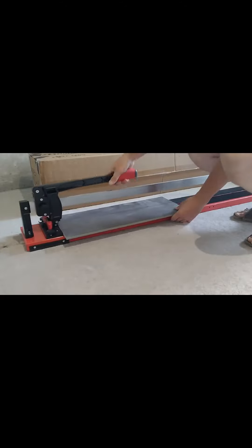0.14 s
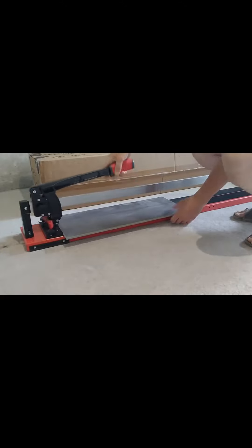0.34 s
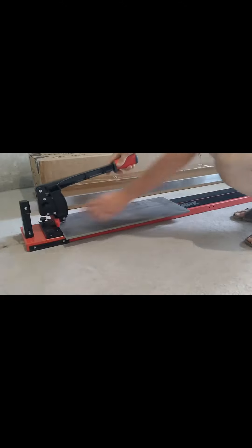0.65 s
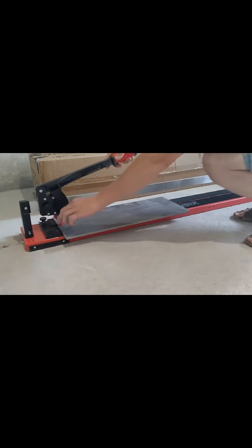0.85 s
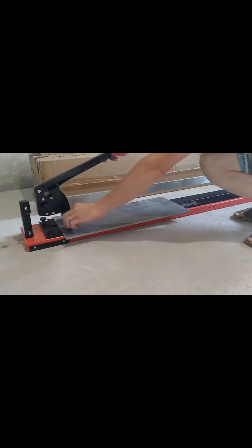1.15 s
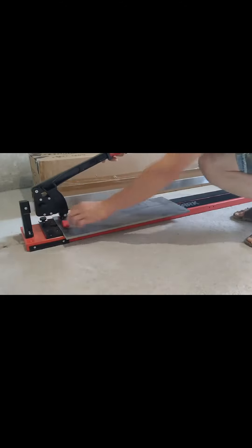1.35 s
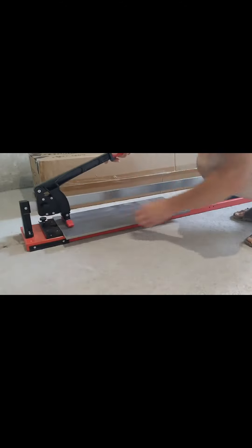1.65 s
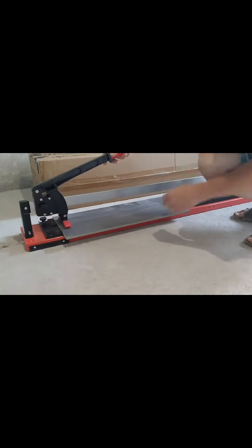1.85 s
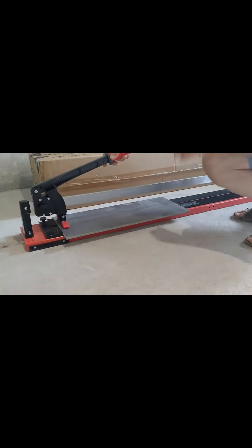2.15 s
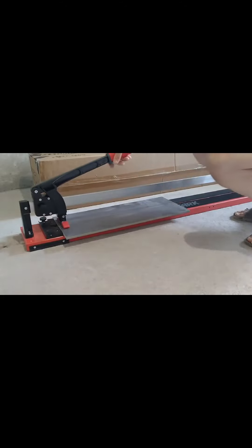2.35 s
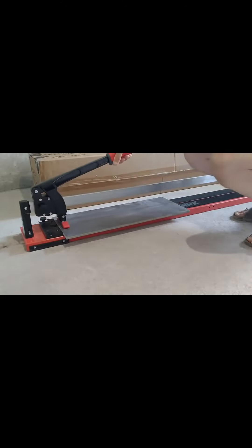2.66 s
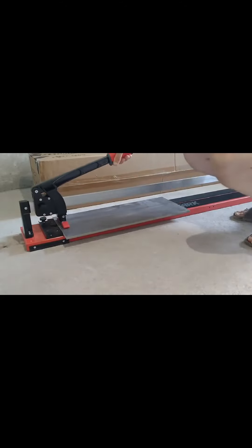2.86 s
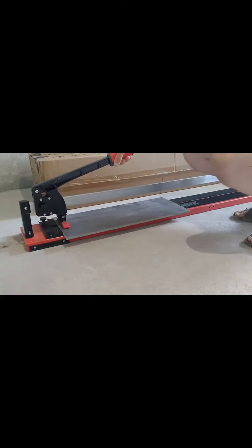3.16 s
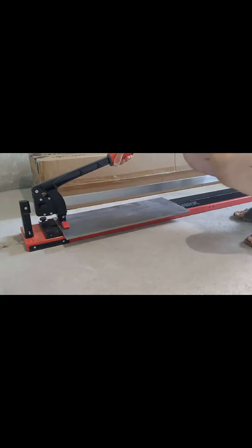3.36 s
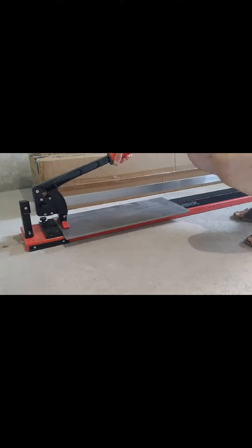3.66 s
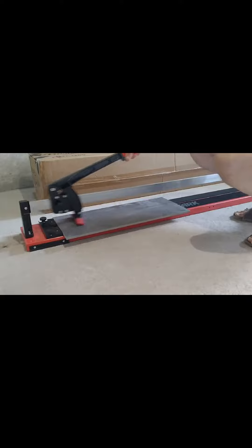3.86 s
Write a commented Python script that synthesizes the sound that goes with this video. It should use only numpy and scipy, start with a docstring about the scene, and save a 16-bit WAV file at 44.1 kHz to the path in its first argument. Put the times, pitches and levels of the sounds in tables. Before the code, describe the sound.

A manual tile cutter gives a heavy, ringing clack with a low hum after it. Faint clicks and a tile tap follow, then a loud cluster of clacks and a brief gritty roll, close by in an echoing room.

```python
"""A manual tile cutter on a concrete floor in a bare, echoing room.
A heavy clack rings its frame and steel rails; a low note hangs on, joined by a deeper drone.
Sleeves rustle on and off, a small catch clicks, the tile is tapped once.
Near 3 s: lighter clacks, a short wheel scrape, heavy clacks, the low note again.
Last, the catch clicks and the carriage starts to roll over grit along the rails."""
import sys
import numpy as np
from scipy import signal
from scipy.fft import rfft, irfft
from scipy.io import wavfile

SR = 44100
rng = np.random.default_rng(int(sys.argv[2]) if len(sys.argv) > 2 else 0)


def transcribe(u):
    """Save the signal u as a 16-bit wav file named by the first command-line argument.

    u: samples, shape (n,) or (channels, n), limited to [-1, 1]; the rate is SR.
    q: integer samples, one column per channel.
    """
    v = np.clip(np.atleast_2d(u).T, -1, 1)
    q = np.round(v * 32767).astype(np.int16)
    wavfile.write(sys.argv[1], SR, q)


N = 176400

# Impact bands: f_low/Hz, f_high/Hz
IMPACT_BANDS = [(90, 350), (350, 900), (900, 1900), (1900, 3100), (3100, 4700), (4700, 10000),
                (10000, 16000)]
# Blows on the frame: t/s, level/dB, 7 band gains/dB, rail ring/dB
FRAME_CLACKS = [(-.012, -11, -18.5, -6.5, -4.5, -7.5, -17, -19, -22.5, -23),
                (2.873, -24, -18, -8.5, -17, -9, -12.5, -11, -19, -6.5),
                (2.887, -24.5, -18, -13, -13, -22, -22.5, -12.5, -10.5, -7.5),
                (3.032, -7, -33, -9.5, -11, -4.5, -8.5, -15, -15.5, -16),
                (3.045, -13.5, -15.5, -13, -9, -2, -5.5, -13.5, -8, 0),
                (3.060, -13, -14, -11.5, -3.5, -22, -17.5, -32, -20.5, 3)]
# Blows on catch and tile: t/s, level/dB, 7 band gains/dB
CATCH_CLICKS = [(.499, -58, -3, -9.5, -9, -8.5, -18, -6, -4),
                (1.085, -48.5, -33, -12, -21, 1.5, -16, -12, -5),
                (1.099, -49, -29, -12, -20, -2, -31, -12, -10),
                (1.1195, -47, -24, -8, -8, -2.5, -28, -26, -16),
                (1.141, -45, -16, -10, 1, 8.5, -16, -11.5, -35),
                (1.153, -39.5, -11, -5, -9.5, -19.5, -13, -29, -18),
                (1.876, -72.5, -31, -25, -24, -8, -13, -14, -5),
                (2.8735, -38, -14, -5, -22, -5, -8, -18, -19),
                (3.766, -61, -32, -11, -14, 5, -12, -14.5, -10.5),
                (3.783, -49, -34, -12, -20, 2, -24, -14, -18),
                (3.789, -54.5, -32, -2, -14.5, -3.5, -28, -14, -13.5),
                (3.818, -51, -18, -5.5, -22, -21, -22, -25, -26)]
TILE_TAP = [(2.149, -63, -31, -5.5, -6, -17, -25, -25, -30),
            (2.1545, -48, -21.5, -11, 0, -7.5, -11, -8.5, -24)]
# Modes: f/Hz, level/dB, t60/s
FRAME_MODES = [(318, -12, 0.067), (523.4, -1.5, 0.08), (600.7, -10, 0.11), (650, -19.5, 0.02),
               (1057, -8.5, 0.27), (1143, 0, 0.031), (1461, 0, 0.098), (1550, -1, 0.048), (1719, -2.5, .08),
               (2019, -10, .06), (2416, 1.5, 0.048), (2813, -6, 0.026), (2936, -3.5, .06),
               (4184, 1.5, 0.18)]
RAIL_MODES = [(4237, -1, .5), (5087, -12, .1), (7850, -6, .12), (8333, -5, .12), (9878, -14, .2),
              (11650, -6, .15), (12200, 0, .3), (12655, -2, .28), (13260, -8, .28), (13650, -10, .2),
              (14510, -8, .2), (14770, -6, .2), (15070, -6, .2), (15490, -3, .22)]
CATCH_MODES = [(348, -11, 0.028), (752, -2, 0.011), (1098, -7, .025), (1254, -9.5, 0.054),
               (1437, -24.5, 0.25), (1634, -11.5, 0.044), (2432, -2, 0.05), (2440.6, -4.5, 0.089),
               (2590, -7.5, .015), (3050, -17, 0.029), (4225, -14, 0.18), (4333, -8.5, 0.036),
               (8400, -10, .012)]
TILE_MODES = [(470, -13, 0.036), (1149, -9.5, 0.075), (1340, -15, 0.057), (1585, -12.5, 0.085),
              (1780, -16.5, 0.09), (2260, -0.5, 0.0075), (2345, -8, 0.089), (2530, 5, 0.018),
              (2703, -3, 0.0091), (2580, -20.5, .08), (4350, -24.5, 0.013)]
# Envelopes: t/s, level/dB
ROLL_ENVELOPE = [(3.79, -56), (3.83, -65), (3.9, -55.5), (4.0, -43)]
SCRAPE_ENVELOPE = [(2.995, -43), (3.005, -39.5), (3.024, -44.5)]
DRONE_ENVELOPE = [(0.5, -73), (0.594, -59.5), (1.002, -60.5), (1.08, -82.5)]
# One envelope per event: t/s, level/dB
BOOM_ENVELOPES = [
    [(0.0, -44), (0.058, -40), (0.294, -43), (0.602, -54.5), (0.628, -72), (0.7, -63)],
    [(3.1, -56), (3.11, -73.5), (3.148, -48), (3.174, -49), (3.59, -65.5), (3.6, -72)],
]
RUSTLE_ENVELOPES = [
    [(0.2, -75), (0.334, -74), (0.408, -67.5), (0.96, -71), (1.07, -79.5)],
    [(1.3, -79), (1.468, -76.5), (1.714, -85), (1.744, -99), (1.8, -93)],
    [(1.89, -94), (1.914, -88), (1.956, -77), (2.066, -99), (2.1, -99)],
    [(2.26, -98), (2.266, -87), (2.282, -68), (2.302, -68), (2.6, -80)],
    [(3.74, -79), (3.788, -62.5), (3.838, -68), (3.85, -78)],
]
# Spectral shapes: f/Hz, level/dB
ROLL_SPECTRUM = [(88, -41), (150, -19.5), (259, -32.5), (534, 1), (637, -16), (790, -0.5), (871, -6.5),
                 (1310, -7), (2450, -13), (3550, -27), (16000, -36)]
SCRAPE_SPECTRUM = [(88, -47.5), (150, -10), (702, -4.5), (854, -14), (1100, 6.5), (1830, -19), (2020, -2),
                   (4670, -24.5), (7770, -10.5), (9440, -25.5), (16000, -15.5)]
RUSTLE_SPECTRUM = [(290, -43.5), (500, -29), (613, 1.5), (740, -7), (1620, -5), (5310, -22.5), (8090, -15),
                   (11300, -21), (15100, -12.5), (16000, -18)]
ROOM_TONE_SPECTRUM = [(8.8, -31.5), (15, 2.5), (38, -16), (75, -10), (97, -22), (184, -21.5), (262, -32),
                      (430, -34.5), (770, -37), (840, -37), (2080, -44), (5440, -51), (16000, -51)]
# Room decay: f/Hz, t60/s
ROOM_DECAY = [(150, 0.8), (400, 0.91), (1040, 0.73), (2760, 0.64), (8500, 0.44), (15000, .3)]
# Colour of the cutter at the microphone: f/Hz, gain/dB
MIC_RESPONSE = [(150, 1), (3000, -2), (3500, -1), (4300, -6.5), (5500, -1), (7000, -1.5), (8200, 2.5),
                (10500, -6.5), (13000, 1.5), (15300, 9)]


def amp(db):
    return 10 ** (np.asarray(db) / 20)


def unit_energy(x):
    return x / np.linalg.norm(x)


def at_hz(table, hz):
    table_hz, values = np.transpose(table)
    return np.interp(np.log(hz + 1), np.log(table_hz + 1), values)


def envelope(points):
    """Gain along the points; -110 dB outside."""
    t_s, db = np.transpose(points)
    return amp(np.interp(np.arange(N) / SR, [t_s[0] - .01, *t_s, t_s[-1] + .01], [-110, *db, -110]))


def coloured(x, spectrum):
    """Shaped spectrum, unit RMS."""
    gain = amp(at_hz(spectrum, np.fft.rfftfreq(len(x), 1 / SR)))
    shaped = irfft(rfft(x) * gain, len(x))
    return shaped / np.sqrt(np.mean(shaped ** 2) + 1e-20)


def ring(modes):
    """Decaying sines of a struck object; neighbours in opposite phase."""
    t_s = np.arange(SR * 3 // 4) / SR
    return unit_energy(sum((-1) ** k * amp(db - 60 * t_s / t60_s) * np.sin(2 * np.pi * hz * t_s)
                           for k, (hz, db, t60_s) in enumerate(modes)))


def impacts(blows, modes, crack_s, ring_db, room_db, rail_room_db=-8):
    """Each blow: a band-shaped pulse excites a crack, the object's modes, any rail ring and the room."""
    lead = round(.1 * SR)  # allows blows before t = 0
    travel_s = .0013
    track = np.zeros(lead + N)
    t_s = np.arange(800) / SR
    filters = [signal.butter(3, edges_hz, "band", fs=SR, output="sos") for edges_hz in IMPACT_BANDS]
    pulses = [unit_energy(signal.sosfilt(sos, signal.unit_impulse(2048))) for sos in filters]
    body_ring, rail_ring = ring(modes), ring(RAIL_MODES)
    for onset_s, level_db, *gains_db in blows:
        force = sum((-1) ** k * amp(level_db + 16 + band_db) * pulse
                    for k, (band_db, pulse) in enumerate(zip(gains_db, pulses)))
        burst = unit_energy(rng.standard_normal(len(t_s)) * t_s * np.exp(-t_s / crack_s))
        crack = signal.fftconvolve(force, burst)
        body = amp(ring_db) * signal.fftconvolve(force, body_ring)
        rail_gain = amp(gains_db[len(pulses):]).sum()  # 0 without a rail column
        rails = rail_gain * signal.fftconvolve(force, rail_ring)
        radiated = body + np.pad(force, (0, len(body) - len(force)))
        sound = signal.fftconvolve(amp(room_db) * radiated + amp(rail_room_db) * rails, room_echoes())
        sound[:len(body)] += body + rails
        sound[:len(crack)] += crack
        start = lead + round((onset_s + travel_s) * SR)
        slot = track[start:start + len(sound)]
        slot += sound[:len(slot)]
    return track[lead:]


def carriage(ticks_per_s=8900, ring_db=-18.5, room_db=5.5):
    """Small wheels scrape, then roll over grit: dense uneven ticks into the frame."""
    tick_db = 5.4 * rng.exponential(1, N).clip(0, 4)
    struck = rng.random(N) < ticks_per_s / SR
    ticks = amp(tick_db) * struck * rng.choice([-1, 1], N)
    scrape = coloured(ticks, SCRAPE_SPECTRUM) * envelope(SCRAPE_ENVELOPE)
    roll = coloured(ticks, ROLL_SPECTRUM) * envelope(ROLL_ENVELOPE)
    wheels = scrape + roll
    direct = wheels + signal.fftconvolve(wheels, amp(ring_db) * ring(FRAME_MODES))[:N]
    return direct + amp(room_db) * signal.fftconvolve(direct, room_echoes())[:N]


def boom(note_hz=58.3, drone_hz=30.2):
    """A low hollow note after the heavy clacks; once, a deeper drone."""
    rad_per_hz = 2 * np.pi * np.arange(N) / SR
    note = sum(map(envelope, BOOM_ENVELOPES)) * np.sin(note_hz * rad_per_hz)
    drone = envelope(DRONE_ENVELOPE) * np.sin(drone_hz * rad_per_hz)
    return np.sqrt(2) * (note + drone)


def sleeve_rustle():
    """Soft hiss of moving cloth and hands."""
    return coloured(rng.standard_normal(N), RUSTLE_SPECTRUM) * sum(map(envelope, RUSTLE_ENVELOPES))


def room_echoes(first_echo_s=.002, build_s=.008):
    """Impulse response: dense echoes build fast; each band decays at its own rate."""
    hz, t_s, noise = signal.stft(rng.standard_normal(SR * 3 // 2), SR, nperseg=256)
    decay = amp(-60 * t_s / at_hz(ROOM_DECAY, hz)[:, None])
    tail = signal.istft(noise * decay, SR, nperseg=256)[1]
    build = np.clip((np.arange(len(tail)) / SR - first_echo_s) / build_s, 0, 1)
    return unit_energy(tail * build)


def room_tone(rms_db=-63):
    """Low rumble, faint hiss."""
    return amp(rms_db) * coloured(rng.standard_normal(N), ROOM_TONE_SPECTRUM)


def mic_colour(x):
    """Minimum-phase microphone response."""
    hz = np.fft.rfftfreq(512, 1 / SR)
    power = amp(2 * at_hz(MIC_RESPONSE, hz))  # minimum_phase takes the square root
    linear_phase = np.roll(irfft(power), 256)[1:]
    return signal.oaconvolve(x, signal.minimum_phase(linear_phase))[:N]


def scene():
    """Cutter over boom, sleeves and room tone; mono."""
    clacks = impacts(FRAME_CLACKS, FRAME_MODES, crack_s=.0023, ring_db=-9, room_db=3.68)
    clicks = impacts(CATCH_CLICKS, CATCH_MODES, crack_s=.00085, ring_db=3.1, room_db=1.1)
    tap = impacts(TILE_TAP, TILE_MODES, crack_s=.0005, ring_db=13, room_db=2)
    cutter = mic_colour(clacks + clicks + tap + carriage())
    return (cutter + sleeve_rustle() + boom() + room_tone())[None]


def record(dry):
    """Band limit."""
    cutoff_hz = 15900
    lowpass = signal.firwin(511, cutoff_hz, window=("kaiser", 9), fs=SR)
    return signal.oaconvolve(dry, lowpass[None], "same")


dry = scene()
out = record(dry)
transcribe(out)
```